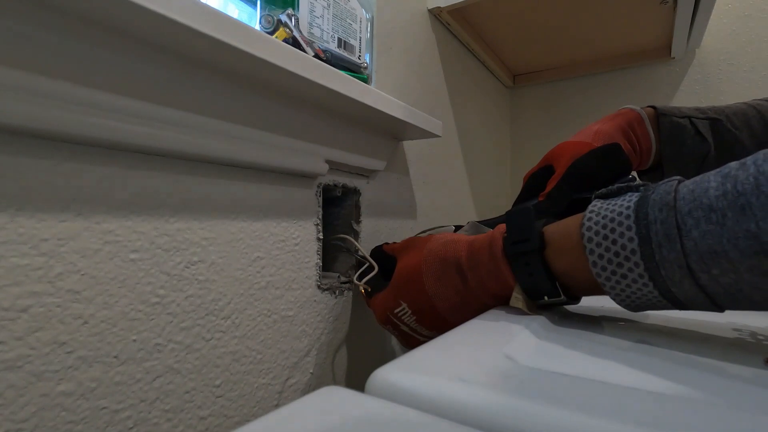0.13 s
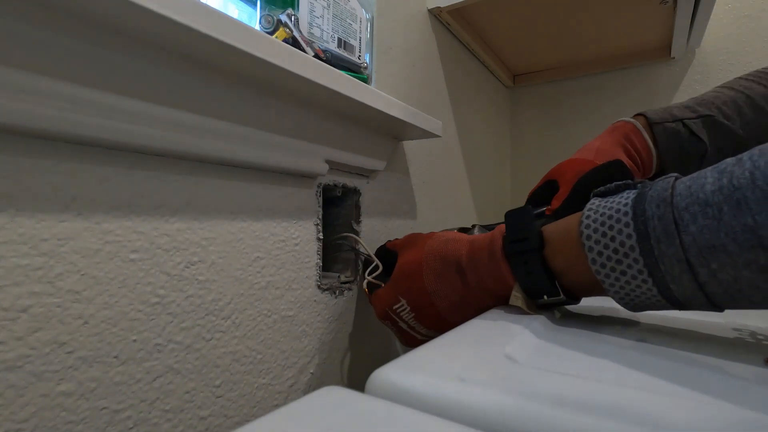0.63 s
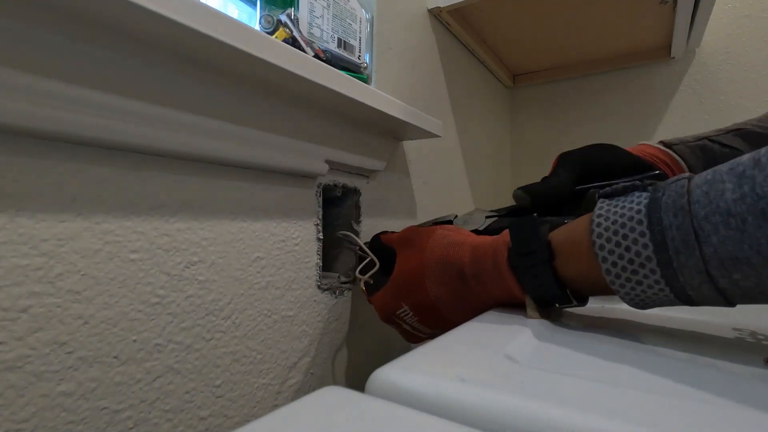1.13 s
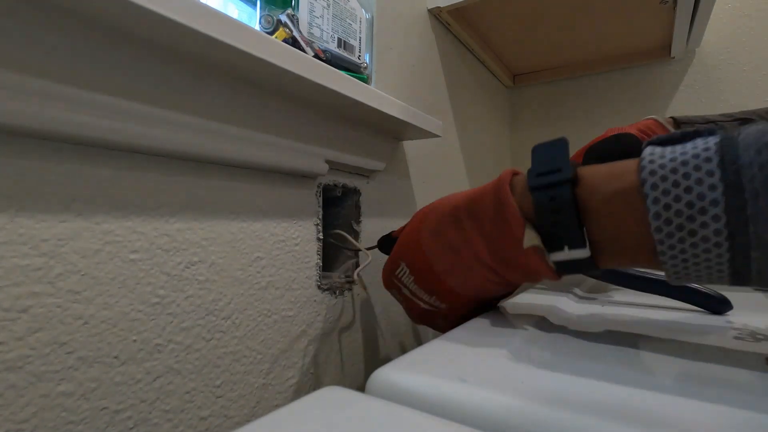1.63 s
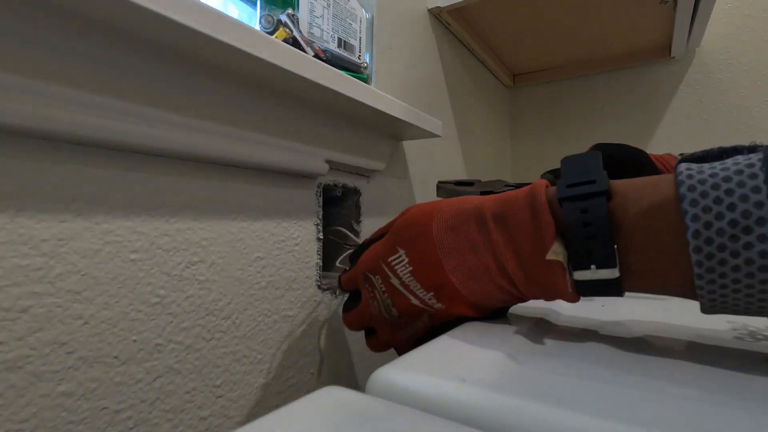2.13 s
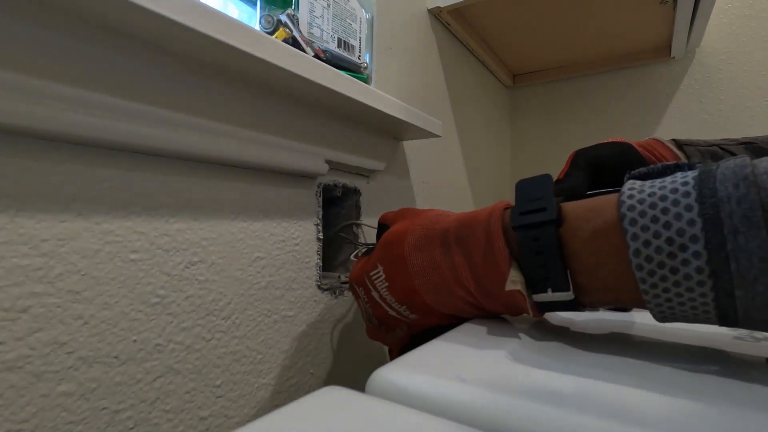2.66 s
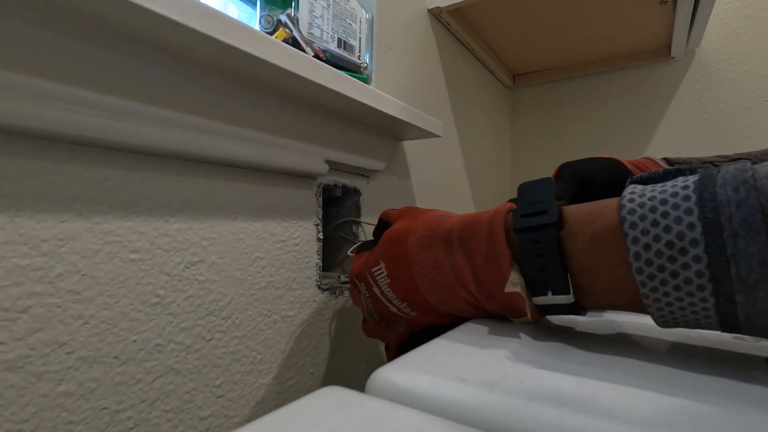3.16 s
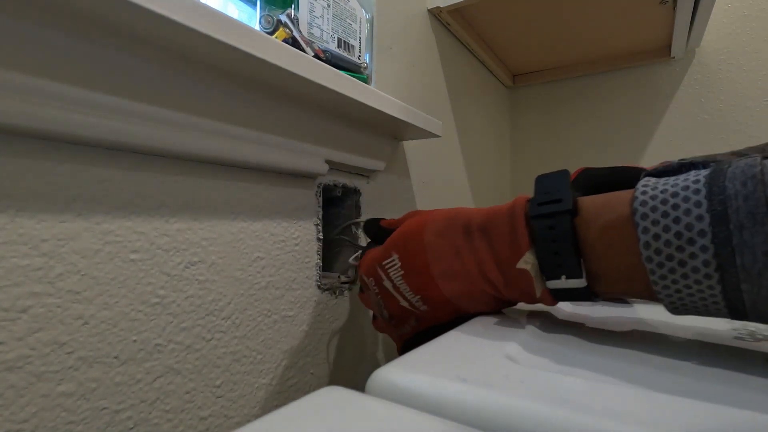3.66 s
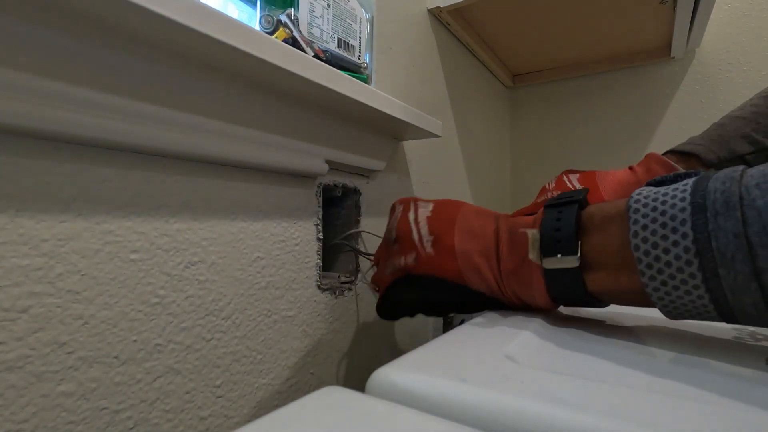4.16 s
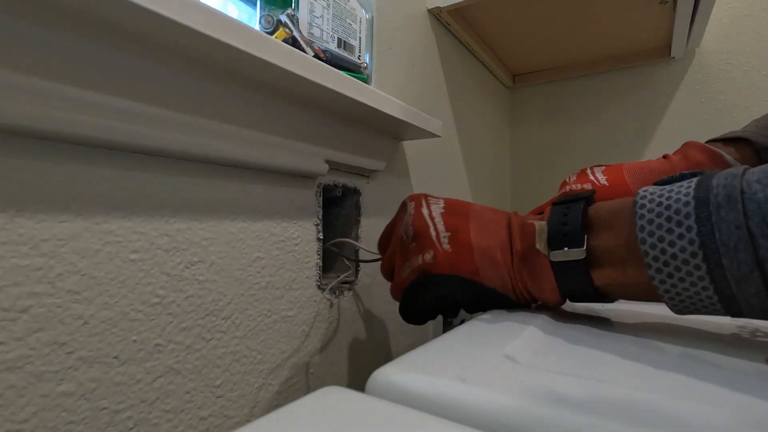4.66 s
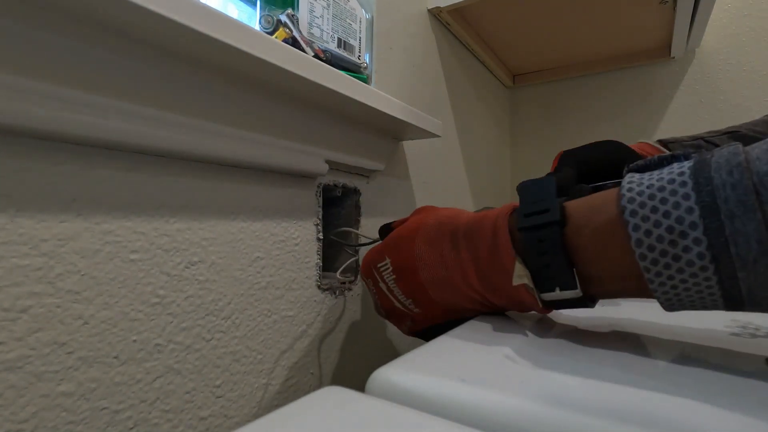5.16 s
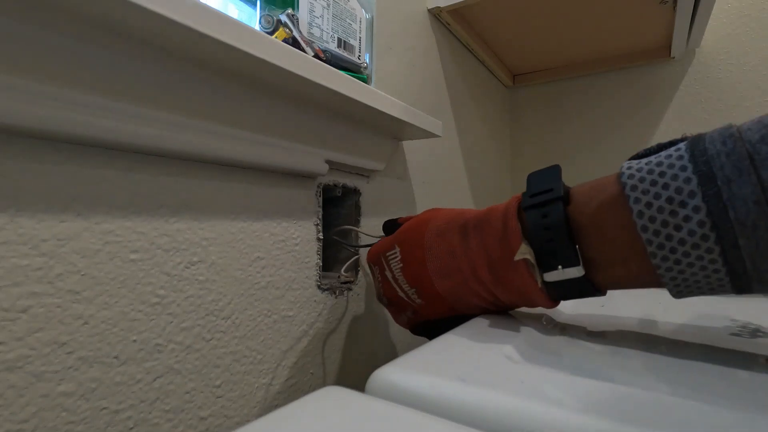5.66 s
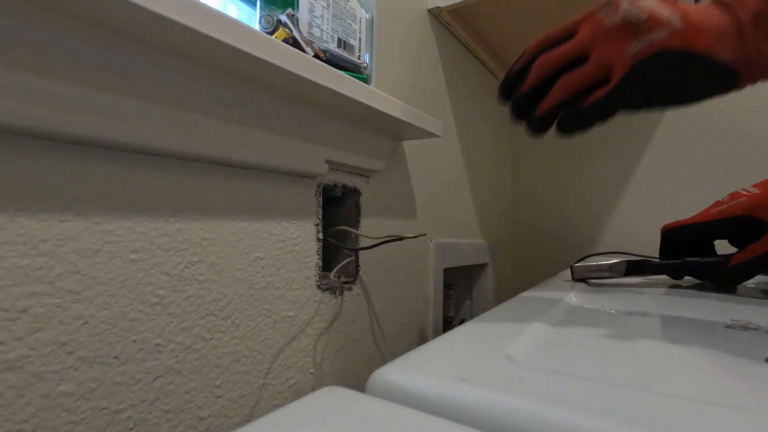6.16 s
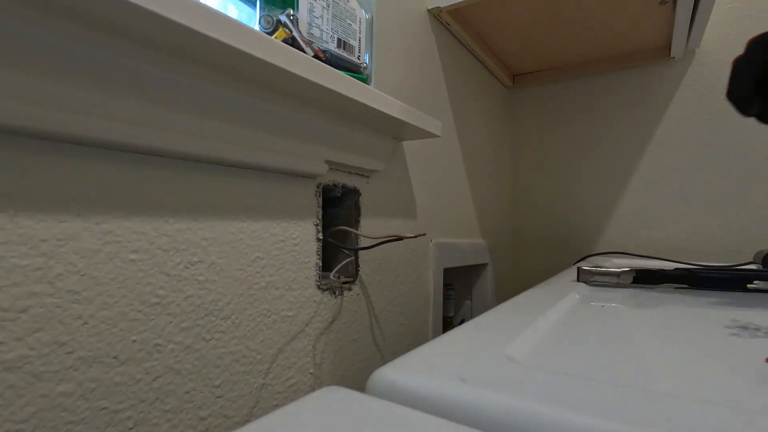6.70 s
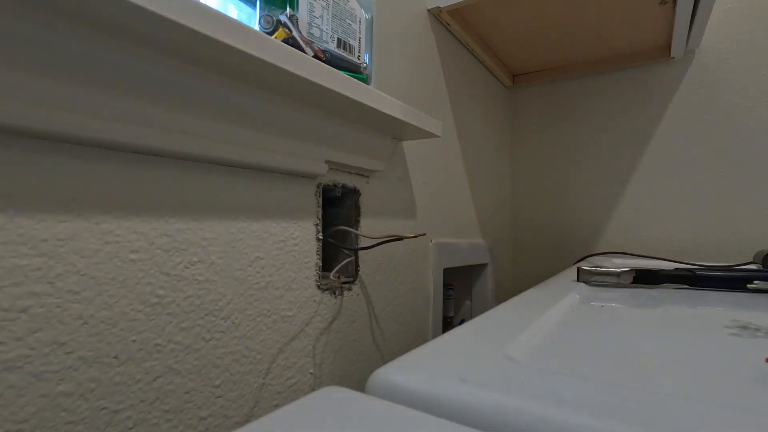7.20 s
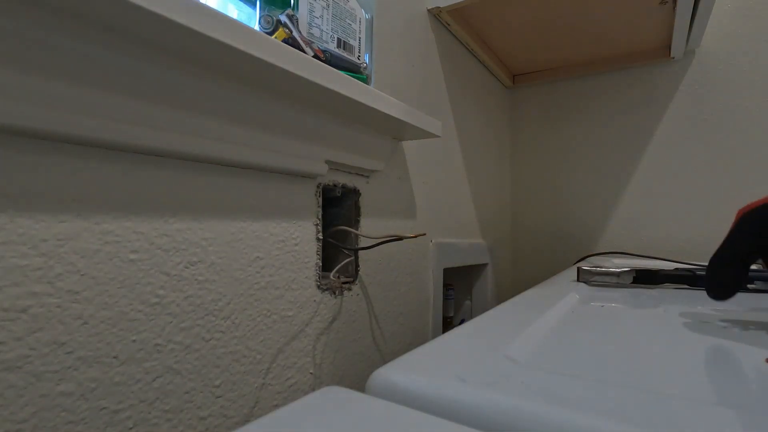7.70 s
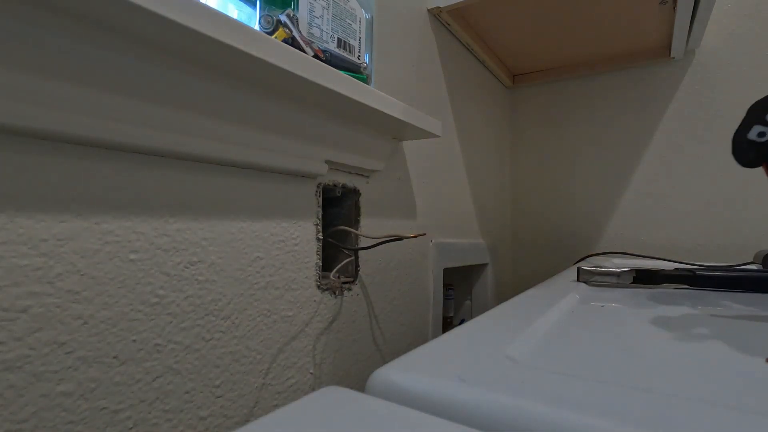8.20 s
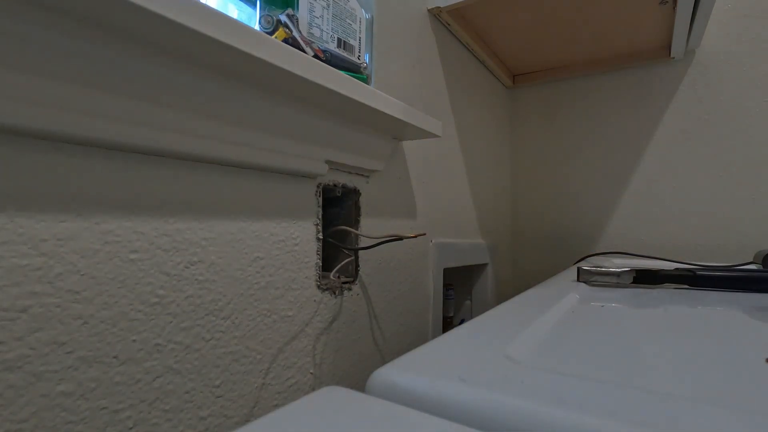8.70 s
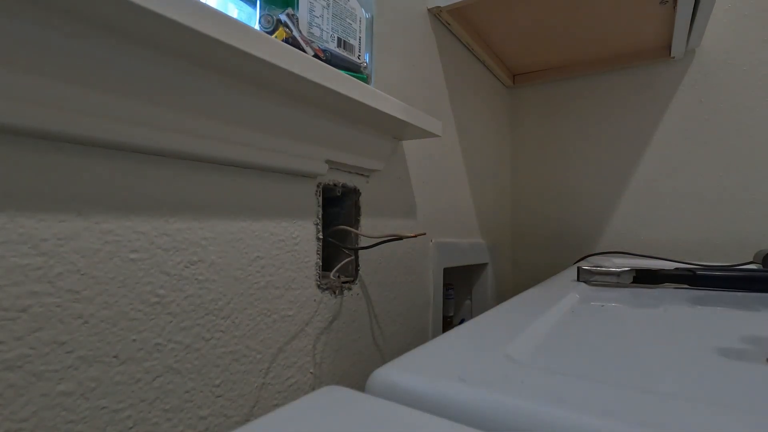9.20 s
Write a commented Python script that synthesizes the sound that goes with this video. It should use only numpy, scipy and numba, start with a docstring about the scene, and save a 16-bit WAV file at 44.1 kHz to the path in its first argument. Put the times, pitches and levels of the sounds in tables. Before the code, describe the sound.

Close wire work indoors: faint ticks, rubbing and rumble, two sharp snips with booming cabinet bangs, a thin screw tinkle, and final metallic knocks.

```python
"""Small room: gloved hands cut and pull wires in a wall box just above two sheet-metal laundry machines.
Blows ring cabinet modes; snips ring jaws, wall and cut wire; ticks are short noise bursts in resonances.
Gloves, sleeves and scrapes are coloured noise; rasps, a squeak and plier chirps come from stick and slip.
A loose screw rings thinly over faint hiss and hum. The microphone stands on one cabinet and feels
every bump; its gain control holds down the loud blows."""
import sys
import numpy as np
from scipy import signal
from scipy.fft import rfft, irfft, next_fast_len
from scipy.io import wavfile
from scipy.ndimage import uniform_filter1d
from numba import njit

SR = 44100
rng = np.random.default_rng(int(sys.argv[2]) if len(sys.argv) > 2 else 0)


def generate_wav(sig):
    """Save sig (samples, or channels by samples) to the path in sys.argv[1] as 16-bit PCM at SR."""
    pcm = np.round(np.clip(np.atleast_2d(sig).T, -1, 1) * 32767).astype(np.int16)
    wavfile.write(sys.argv[1], SR, pcm)


def makeup_ratio(level_db):
    """Linear amplitude ratio for a level in decibels (20 dB per factor of ten)."""
    decades = np.asarray(level_db, float) / 20
    return 10 ** decades


N = 411453  # samples


def level(x, db):
    """Scale to an rms level."""
    return x * makeup_ratio(db) / np.sqrt(np.mean(x ** 2))


def lookup(table, hz):
    """Read (Hz, value) points on a log-frequency axis."""
    table_hz, value = np.transpose(table)
    return np.interp(np.log(np.maximum(hz, 1)), np.log(table_hz), value)


def octaves_above(f, hz):
    """Octaves of f above hz, 0 below."""
    return np.maximum(np.log2((f + 1) / hz), 0)


def octaves_below(f, hz):
    """Octaves of f below hz, 0 above."""
    return np.maximum(np.log2(hz / (f + 1)), 0)


def bump(f, hz, width_hz):
    """Gain of a resonance, 1 at its centre."""
    return 1 / np.sqrt(1 + (2 * (f - hz) / width_hz) ** 2)


def colour(x, gain_db):
    """Causal filter from a function of frequency that gives dB (minimum phase through the cepstrum)."""
    size = 2 * next_fast_len(x.shape[-1] // 2 + 2048)
    hz = np.arange(size // 2 + 1) * SR / size
    ceps = irfft(gain_db(hz) * np.log(10) / 20, size)
    ceps[1:size // 2] *= 2
    response = np.exp(rfft(ceps[:size // 2 + 1], size))
    return irfft(rfft(x, size) * response, size)[..., :x.shape[-1]]


def pair(shape, wide):
    """Left and right noise: a shared part and a weaker opposed part."""
    mid, side = rng.standard_normal((2, *shape))
    return np.stack([mid + wide * side, mid - wide * side]) / np.hypot(1, wide)


def walk(rate_hz):
    """Random levels held 1 / rate_hz s and slewed twice."""
    k = int(SR / rate_hz)
    steps = np.repeat(rng.standard_normal(N // k + 1), k)
    return 1.1 * uniform_filter1d(uniform_filter1d(steps, k), k)[:N]


def decay(t, t60_s):
    """Exponential decay by 60 dB in t60_s."""
    return np.exp(-np.log(1000) * t / t60_s)


def ring(t, hz, db, t60_s):
    """One decaying sine mode."""
    return makeup_ratio(db) * np.sin(2 * np.pi * hz * t) * decay(t, t60_s)


def grit(length_s, spread_db):
    """A stroke of dense slips of very uneven size."""
    size = int(length_s * SR)
    slips = rng.standard_normal(size) * makeup_ratio(spread_db * rng.exponential(size=size))
    return slips * np.sqrt(np.hanning(size))


def add(out, x, s):
    """Mix a sound in at time s."""
    i = int(s * SR)
    out[..., i:i + x.shape[-1]] += x[..., :N - i]


# blows on the cabinets: (time [s], 500-2500 Hz level [dB], boom level [dB], lid panel level [dB],
# treble level [dB], pitch favoured by the spot [Hz])
BLOWS = [(0.37, -73, -74, -42.5, -87, 203), (0.62, -11, -29, -30, -39.5, 180),
         (0.875, -55, -22.5, -48, -61, 55), (1.019, -58.5, -71, -35.5, -88, 239),
         (1.676, 8.5, -4.5, -12.5, -11, 167), (1.92, -38, -33.5, -41, -78.5, 111.3),
         (2.566, -77.5, -37.5, -43.5, -103, 74.7), (2.89, -29.5, -53, -57, -52, 553),
         (3.743, -50, -23, -57, -55, 55.3), (3.811, -30.5, -21.5, -42.5, -71, 60.3),
         (4.174, -46, -60, -42, -68, 207), (4.518, -42, -61.5, -53, -43, 336),
         (4.809, -18, -38, -51, -61, 298), (4.822, -57, -43, -41, -56, 200),
         (4.846, -60, -26.5, -53, -80, 138), (4.892, -37, -57, -41.5, -43.5, 201),
         (5.17, -25.5, -68, -37.5, -84, 216), (5.412, -37, -28.5, -47.5, -52, 117),
         (5.898, -0.5, -6.5, -12.5, -6.5, 183), (5.983, -5.5, -20.5, -18.5, -22, 187),
         (6.424, -10.5, -18.5, -27, -33.5, 115), (6.501, -6.5, -18.5, -24, -25, 183),
         (7.842, -68, -24.5, -52.5, -61, 68), (7.867, -59, -47, -46, -57, 185),
         (7.979, -61.5, -34.5, -46, -78, 95.5), (8.651, -34, -26, -59, -28, 59.1),
         (8.703, -4.5, -17, -33.5, -17.5, 61), (8.937, -18.5, -38, -62, -45, 91),
         (9.086, 1.5, -14, -22, -19.5, 93.5), (9.108, -18, -34, -22, -18, 320),
         (9.219, -5, -16.5, -19.5, -18, 182)]
# strongest sheet-metal modes: (frequency [Hz], relative level [dB], t60 before cap and damping [s])
CABINET_MODES = [(53.4, -3, 1), (91.7, -5, 1), (118.5, -2, 0.95), (167, -5.5, 1), (183, 5, 0.46),
                 (218, -3, 0.98), (283, -7, 0.2), (327.7, -2.5, 0.94), (404, -8, 0.8), (457, -2, 0.28),
                 (554, -16.5, 0.17), (945, -15.5, 0.45), (1042, -20, 0.6), (1222, -22, 0.4),
                 (1375, -21.5, 0.3), (2163, -32, 0.33), (3470, -21.5, 0.2)]
# free ring of the dense modes: (frequency [Hz], typical t60 [s])
FREE_RING = [(40, 0.72), (130, 1), (350, 0.78), (900, 0.98), (2500, 0.096), (8000, 0.79)]
# colour of a blow: (frequency [Hz], relative level [dB per Hz])
BLOW_COLOUR = [(18, -38), (30, -3), (133, -1), (177, -4.5), (256, 2.5), (455, -5.5), (787, -16.5),
               (970, -20.5), (1140, -22.5), (5590, -20), (12300, -43), (14300, -49.5), (15500, -64)]


def hits(count=420):
    """Each blow wakes the cabinet modes in its own mix; a crack and a noisy tail carry the treble."""
    ring_share = 0.58  # damped ring as share of a free ring of about 0.5 s
    t = np.arange(int(0.5 * SR)) / SR
    s, body_db, boom_db, lid_db, bright_db, spot_hz = np.transpose(BLOWS)
    strong_hz, strong_db, strong_t60_s = np.transpose(CABINET_MODES)
    dense_hz = 40 + 4200 * np.sort(rng.random(count)) ** 1.5
    dense_t60_s = lookup(FREE_RING, dense_hz) * makeup_ratio(1.5 * rng.standard_normal(count))
    hz = np.r_[dense_hz, strong_hz]
    t60_s = np.r_[dense_t60_s, np.minimum(strong_t60_s, 0.7)]
    # dense modes follow the colour of a blow, weighted by their spacing
    dense_db = lookup(BLOW_COLOUR, dense_hz) + 3.3 * np.log10(dense_hz / 200) - 10
    mode_db = np.r_[dense_db, strong_db + 3]
    build = 1 - np.exp(-np.outer(hz, t) / 0.35)  # low modes take about a cycle to swing up
    spin = np.exp(np.outer(2j * np.pi * hz - np.log(1000) / t60_s, t))
    waves = (build * spin).astype(np.complex64)

    # strength against an even blow at four pitches; softer contact wakes fewer high modes
    strength = np.transpose([boom_db + 2, lid_db, body_db - 3, bright_db + 11.5])
    points = np.log([80, 260, 1000, 3300])
    strength_db = np.array([np.interp(np.log(hz), points, row) for row in strength])
    fade_db = -14 * np.maximum(np.log2(hz / 2400), 0)  # above this the noisy tail takes over
    gain = makeup_ratio(mode_db + fade_db + strength_db - 10)
    gain = gain * (1 + 1.6 * bump(hz, spot_hz[:, None], spot_hz[:, None] / 6) ** 2)
    chance = rng.standard_normal((len(s), 3, len(hz)))
    mid = gain * makeup_ratio(3 * chance[:, 0]) * np.exp(2j * np.pi * rng.random(gain.shape))
    side_share = np.minimum(0.015 + hz / 4000, 0.33)  # lows reach both ports alike
    side = gain * side_share * (chance[:, 1] + 1j * chance[:, 2])
    modes = (np.r_[mid + side, mid - side].astype(np.complex64) @ waves).imag.reshape(2, len(s), -1)

    noise = pair((len(s), len(t)), 0.49)
    held = decay(t, 0.5 / (1 / ring_share - 1))  # a hand on the panel shortens the ring
    onset = 1 + 0.038 * np.exp(-t / 0.0023)
    tail = np.exp(-t / 0.00063) + 0.78 * decay(t, 0.45 * ring_share)
    out, bright, clatter = np.zeros((3, 2, N))
    for k in range(len(s)):
        add(out, modes[:, k] * held * onset, s[k])
        add(bright, noise[:, k] * tail * makeup_ratio(bright_db[k]), s[k])
        add(clatter, noise[:, k, ::-1] * tail * makeup_ratio(body_db[k]), s[k])  # loose panels buzz along
    buzz = lambda f: lookup(BLOW_COLOUR, f) + 20 * np.log10(bump(f, 900, 1800) ** 3)
    return out + makeup_ratio(-5) * colour(bright, treble) + makeup_ratio(-3.5) * colour(clatter, buzz)


def treble(f):
    """Colour in dB of the bright part of any contact."""
    return lookup(BLOW_COLOUR, f) - lookup(BLOW_COLOUR, 4500) - 12 * octaves_below(f, 3000) ** 2


# bites through a wire: (time [s], level [dB], low tone of the cut end [Hz], high tone [Hz],
# low tone level against the bite [dB], t60 of both [s])
BITES = [(1.676, -9, 1477, 1681, -35.5, 0.97), (5.898, -11, 1534, 1678, -9, 0.33)]
# modes of jaws and wall: (frequency [Hz], level against the bite [dB], t60 [s])
SNAP_MODES = [(1610, -4, 0.046), (1700, -1, 0.044), (2880, -4.5, 0.012), (4800, -18, 0.011),
              (351, -32, 1.6), (400, -29, 1.16), (510, -29.5, 1)]


def snips():
    """One sharp push sets the jaws and the wall ringing; the cut wire end sings on faintly."""
    out, t = np.zeros(N), np.arange(SR) / SR
    snap = -sum(ring(t, *mode) for mode in SNAP_MODES)
    for s, db, low_hz, high_hz, wire_db, t60_s in BITES:
        wire = ring(t, low_hz, wire_db, t60_s) + ring(t, high_hz, wire_db - 1, t60_s)
        add(out, makeup_ratio(db) * (snap + wire), s)
    return out


# contacts of wire and tool: (time [s], relative body level [dB], body pitch [Hz], relative treble level [dB])
CONTACTS = [(0.171, -42, 590, -56), (0.197, -34.5, 604, -83), (0.291, -42.5, 470, -89),
            (0.371, -42.5, 490, -47.5), (0.393, -46.5, 2160, -53), (0.424, -33, 1005, -71),
            (0.484, -34.5, 1000, -69), (0.564, -45.5, 1980, -56.5), (0.751, -61, 770, -45),
            (0.764, -61, 607, -37), (0.93, -38.5, 2100, -53.5), (1.055, -34, 1040, -89),
            (1.327, -33, 1004, -59), (1.422, -41.5, 940, -96), (1.578, -47, 1500, -42),
            (1.918, -49, 1000, -70), (2.193, -35, 1060, -84), (2.315, -44.5, 1096, -86),
            (2.473, -38, 1030, -81), (2.549, -39, 985, -80), (2.599, -46, 945, -80),
            (2.652, -46, 1070, -87), (2.128, -36, 333, -97), (2.726, -33.5, 1520, -54),
            (2.73, -31, 950, -55.5), (2.819, -41.5, 1260, -64), (2.894, -22, 590, -45),
            (2.845, -50, 1300, -62), (2.914, -43, 1850, -48), (2.922, -28.5, 964, -61),
            (2.982, -32, 560, -63), (3.013, -41, 1290, -61), (3.064, -39.5, 965, -50.5),
            (3.092, -41, 980, -55), (3.269, -48, 970, -78), (3.364, -32.5, 950, -44.5),
            (3.431, -36.5, 1880, -57), (3.715, -48, 1940, -85), (3.815, -24, 338, -61),
            (3.915, -24.5, 942, -63), (3.958, -41, 1060, -47), (4.174, -26, 1500, -32),
            (4.199, -29, 1540, -41), (4.255, -25.5, 1360, -42), (4.268, -41, 1370, -38),
            (4.415, -30, 920, -46.5), (4.486, -25, 945, -41), (4.522, -17.5, 340, -57),
            (4.535, -20.5, 1000, -39), (4.518, -30, 1580, -63), (4.633, -36, 960, -61),
            (4.65, -35, 1360, -51), (4.697, -38, 950, -42.5), (4.795, -35.5, 970, -56),
            (4.82, -30, 965, -60), (4.853, -42, 990, -63), (4.833, -33, 1620, -54), (4.893, -21, 990, -52),
            (4.98, -31.5, 970, -63), (5.005, -35, 1010, -78), (5.048, -50, 2020, -61),
            (5.114, -54, 1490, -60), (5.172, -20, 340, -55), (5.178, -23.5, 980, -65),
            (5.245, -59, 1000, -67), (5.409, -28, 1010, -38), (5.429, -22.5, 834, -47),
            (5.535, -43, 2160, -50.5), (5.876, -39.5, 1500, -47), (5.886, -27, 1700, -53),
            (6.876, -44.5, 1140, -62), (7.225, -42, 1104, -71), (7.887, -44, 1170, -51),
            (7.905, -42, 1170, -47), (7.975, -57, 2000, -45.5), (7.99, -67, 1990, -71),
            (8.037, -53, 2050, -82), (8.083, -62, 2100, -63.5), (8.11, -62.5, 2050, -53.5),
            (8.16, -56, 2230, -45), (8.175, -75.5, 2196, -44), (8.2, -70, 2190, -39.5),
            (8.4, -51, 2020, -40), (8.562, -62, 1020, -59), (8.848, -60, 1000, -49)]
# small parts in the box that any tick may ring: (frequency [Hz], width [Hz])
SMALL_PARTS = [(555, 40), (1290, 90), (1650, 110), (1850, 120), (2380, 140), (3300, 220), (4300, 260),
               (5200, 320), (6700, 500)]
# wall box resonances: (frequency [Hz], width [Hz], relative level [dB])
WALL_BOX = [(942, 65, 2), (1324, 900, -8.5), (3000, 18, -8), (3500, 23, -21.5), (3600, 14, -5.5),
            (4600, 270, -14.5)]


def ticks():
    """A crack and its echo in the nook ring body, treble resonance, lesser modes, box and the wall's thud."""
    ping_usual_hz, ping_scatter_octaves = 4570, 0.063
    nook_t60_s, echo_share = 0.58, 0.13  # t60 before the linear fade
    out, t = np.zeros((2, N)), np.arange(SR // 5) / SR
    noise = pair((len(CONTACTS), len(t)), 0.37)
    parts_hz, parts_width_hz = np.transpose(SMALL_PARTS)
    rung = 4 * rng.random((len(CONTACTS), len(SMALL_PARTS))) ** 3
    lesser_hz = parts_hz * (1 + 0.025 * rng.standard_normal(rung.shape))
    pings_hz = ping_usual_hz * 2 ** (ping_scatter_octaves * rng.standard_normal(len(CONTACTS)))
    envelope = 0.55 * np.exp(-t / 0.0061) + echo_share * decay(t, nook_t60_s)
    envelope = envelope * (1 - t / t[-1]) * (1 - np.exp(-t / 0.00017))
    click = 4.5 * (t == t[8])  # first sharp contact
    for k, (s, body_db, body_hz, bright_db) in enumerate(CONTACTS):

        def tick_db(f):
            part = makeup_ratio(10.5) * bump(f, body_hz, body_hz / 6.5) ** 2 + makeup_ratio(-7) * bump(f, 1400, 800) ** 3
            thud = makeup_ratio(11) * bump(f, 280, 230) ** 2
            box = makeup_ratio(5.5) * bump(f, *WALL_BOX[0][:2]) ** 3
            ping = makeup_ratio(-12) * bump(f, pings_hz[k], pings_hz[k] / 7) + makeup_ratio(6.5)
            ping = ping * makeup_ratio(bright_db + treble(f) + 6.2 * octaves_above(f, 5500))
            lesser = zip(rung[k], lesser_hz[k], parts_width_hz)
            metal = 1 + sum(g * bump(f, hz, width_hz) ** 2 for g, hz, width_hz in lesser)
            return 20 * np.log10((makeup_ratio(body_db) * (part + thud + box) + ping) * metal)

        add(out, colour(noise[:, k] * envelope + click, tick_db), s)
    return out


def aftershock(s, db, peak_s):
    """Energy that swells and dies away after each blow."""
    u = np.maximum(np.arange(N)[::64] / SR - s[:, None], 0) / peak_s
    swell = u * np.exp(1 - u)
    return np.repeat(np.sqrt(makeup_ratio(db) ** 2 @ swell ** 2), 64)[:N]


# hands at work: (time [s], relative 500-2500 Hz rub level [dB], relative cloth hiss level [dB])
GLOVES = [(0.0, -72, -85), (0.7, -56, -66), (1.529, -67.5, -74.5), (1.74, -24.5, -42), (1.9, -62, -68.5),
          (2.521, -70, -63.5), (2.91, -54.5, -109), (3.15, -79, -102), (3.33, -63.5, -71),
          (3.77, -56, -55.5), (4.18, -62, -74), (4.39, -50.5, -71.5), (5.2, -60.5, -63.5),
          (5.299, -76.5, -75), (5.72, -68.5, -67.5), (6.08, -57.5, -68), (7.3, -75, -78), (8.7, -65, -68),
          (8.81, -71, -48), (9.12, -35, -66.5), (9.33, -86, -85)]
# weight of the arms on the cabinets: (time [s], rumble level [dB])
ARM_WEIGHT = [(0.0, -40.5), (0.31, -47), (0.93, -34), (1.38, -39), (1.79, -29), (2.26, -43.5), (3.19, -40),
              (4.0, -41.5), (4.6, -38), (5.14, -29.5), (5.87, -47.5), (6.0, -55), (6.37, -30.5),
              (6.55, -45), (7.27, -45.5), (8.58, -44.5), (8.78, -65), (9.33, -46)]
# scrapes of wire and glove: (start [s], length [s], relative body level [dB], relative hiss level [dB])
STROKES = [(0.733, 0.29, -58.5, -52.5), (1.15, 0.22, -80, -56), (1.48, 0.2, -59, -49.5),
           (2.195, 0.084, -55.5, -56.5), (2.487, 0.056, -47.5, -65.5), (2.888, 0.05, -36, -63),
           (3.577, 0.12, -41.5, -54.5), (3.759, 0.1, -48, -50), (3.881, 0.16, -44.5, -69),
           (4.266, 0.13, -44.5, -59.5), (4.477, 0.097, -42, -52), (4.622, 0.069, -46, -50),
           (4.802, 0.061, -52, -49), (5.026, 0.17, -50.5, -58), (5.36, 0.107, -47, -53),
           (5.657, 0.14, -55, -80), (6.289, 0.11, -46.5, -61), (7.822, 0.19, -53.5, -58.5),
           (8.092, 0.13, -91, -58), (8.636, 0.13, -29, -36), (8.714, 0.086, -36.5, -56)]
# colour of rubbing: (frequency [Hz], relative level [dB per Hz])
RUB_COLOUR = [(120, -43.5), (200, 17.5), (283, 0), (446, -0.5), (690, -14), (923, -8.5), (1050, -6),
              (1330, -1.5), (2650, -25.5), (7620, -25), (12200, -49), (15500, -57)]
# colour of the arms' rumble: (frequency [Hz], relative level [dB per Hz])
LEAN_COLOUR = [(12, -27), (20, 13.5), (31, 5.5), (49, -10), (71, -6.5), (136, -21.5), (230, -21.5),
               (400, -48.5), (520, -61.5), (880, -120)]


def hands():
    """Rubbing is noise roughened by tiny slips, ringing in the wall box; the arms rumble in the cabinets."""
    shake_peak_s, shake_db = 0.045, -36  # loose parts shake on after a blow; level against the blow
    rock_peak_s, rock_db = 0.15, -18.5  # cabinets rock on their feet after a boom; level against the boom
    t = np.arange(N) / SR
    s, rub_db, cloth_db = np.transpose(GLOVES)
    rub, hiss = makeup_ratio(np.interp(t, s, rub_db)), makeup_ratio(np.interp(t, s, cloth_db))
    lean = makeup_ratio(np.interp(t, *np.transpose(ARM_WEIGHT)))
    blow_s, blow_db, boom_db = np.transpose(BLOWS)[:3]
    rub = np.hypot(rub, aftershock(blow_s, blow_db + shake_db, shake_peak_s))
    lean = np.hypot(lean, aftershock(blow_s, boom_db + rock_db, rock_peak_s))
    for start_s, length_s, body_db, hiss_db in STROKES:
        span = slice(int(start_s * SR), int((start_s + length_s) * SR))
        stroke = np.sin(np.pi * (t[span] - start_s) / length_s)
        rub[span] = np.hypot(rub[span], makeup_ratio(body_db) * stroke)
        hiss[span] = np.hypot(hiss[span], makeup_ratio(hiss_db) * stroke)

    grain = pair((N,), 0.53) * makeup_ratio(2.7 * walk(250) + 2 * walk(60) + 3 * walk(15))

    def hollow(f):
        box = sum(makeup_ratio(db) * bump(f, hz, width_hz) for hz, width_hz, db in WALL_BOX)
        return lookup(RUB_COLOUR, f) + 20 * np.log10(makeup_ratio(-10.5) + box)

    low = colour(grain, lambda f: hollow(f) - 30 * octaves_above(f, 2500))
    high = colour(grain, lambda f: hollow(f) - 30 * octaves_below(f, 2500))
    rumble = pair((N,), 0.08) * makeup_ratio(walk(25) + 3 * walk(6))
    rumble = colour(rumble, lambda f: lookup(LEAN_COLOUR, f))
    body = level(low, -6.5) + level(rattle(), -3.5)
    return body * rub + level(high, -1.3) * hiss + level(rumble, 0) * lean


def rattle(count=12):
    """Wire ends catch and slip: sparse pokes in clumps, each part ringing briefly at its own pitch."""
    out = 0
    for hz in 260 * 2 ** (4.1 * (np.arange(count) + rng.random(count)) / count):
        poked = rng.random(N) < 90 / SR * makeup_ratio(5 * walk(14))
        pokes = poked * makeup_ratio(np.minimum(3 * rng.exponential(size=N), 8))
        fade = signal.lfilter([1], [1, -np.exp(-1 / (0.0051 * SR))], pokes)
        push = pair((N,), 0.1) * fade
        out = out + signal.lfilter(*signal.iirpeak(hz, 14, SR), push) * makeup_ratio(lookup(RUB_COLOUR, hz))
    return out


# wire dragged over an edge: (start [s], length [s], level [dB], resonance [Hz], width [Hz])
DRAGS = [(3.601, 0.11, -54.5, 1630, 1100), (4.293, 0.055, -55, 1300, 403), (4.472, 0.034, -54, 1160, 497),
         (4.622, 0.042, -52, 1400, 400), (8.655, 0.043, -41, 2420, 900), (8.69, 0.061, -34.5, 980, 850),
         (8.813, 0.067, -49, 4860, 2174), (8.94, 0.21, -47, 990, 605)]


def rasps():
    """Dense slips ring a broad resonance, with a few sharper ones inside it."""
    out = np.zeros((2, N))
    for s, length_s, db, hz, width_hz in DRAGS:
        slips = grit(length_s, 2.2) + 0.4 * np.outer([1, -1], grit(length_s, 2.2))
        push = np.pad(slips, ((0, 0), (0, 800)))
        sharp_hz = hz + width_hz * rng.uniform(-0.41, 0.41, 4)

        def edge_db(f):
            sharp = 1 + sum(0.7 * bump(f, p, p / 20) ** 2 for p in sharp_hz)
            return 20 * np.log10(bump(f, hz, width_hz) ** 2 * sharp)

        add(out, level(colour(push, edge_db), db), s)
    return out


# insulation squeaks on the box edge: (time [s], pitch [Hz], level [dB])
INSULATION = [(3.71, 2270, -66), (3.719, 2250, -52), (3.736, 1703, -45.5), (3.752, 1896, -51),
              (3.768, 2350, -52), (3.784, 2400, -64)]


def squeak():
    """A stick-slip tone with a wavering period and its octave."""
    s, hz, db = np.transpose(INSULATION)
    t = np.arange(s[0], s[-1], 1 / SR)
    waver = uniform_filter1d(rng.standard_normal((2, len(t))), size=40) * np.sqrt(40)
    pitch_hz = np.interp(t, s, hz) * (1 + 0.05 * waver[0])
    phase = 2 * np.pi * np.cumsum(pitch_hz) / SR
    tone = np.sin(phase) + makeup_ratio(-10) * np.sin(2 * phase)
    out = np.zeros(N)
    add(out, makeup_ratio(np.interp(t, s, db) + 3.2 * waver[1]) * tone, s[0])
    return out


# plier joint chirps: (start [s], length [s], level [dB], lean to the upper modes [dB])
JOINT_CHIRPS = [(1.572, 0.02, -62, 9), (1.588, 0.03, -58, 1), (1.62, 0.045, -69, 16),
                (5.378, 0.025, -65, 8), (5.408, 0.04, -61, -12)]
# plier modes: (frequency [Hz], width [Hz], relative level [dB])
PLIER_MODES = [(2250, 50, 0), (3410, 260, -9), (4290, 40, -1), (5000, 300, -10), (6600, 400, -11)]


def pliers():
    """The joint sticks and slips in gritty jerks as the jaws close; its modes ring on."""
    out = np.zeros(N)
    for s, length_s, db, tilt_db in JOINT_CHIRPS:
        push = np.r_[grit(length_s, 2.5), np.zeros(SR // 10)]
        sound = 0
        for hz, width_hz, mode_db in PLIER_MODES:
            gain = makeup_ratio(mode_db + tilt_db * np.clip(np.log2(hz / 2250), 0, 1)) / np.sqrt(width_hz)
            sound = sound + gain * signal.lfilter(*signal.iirpeak(hz, hz / width_hz, SR), push)
        add(out, level(sound, db) * np.sqrt(len(push) / SR / length_s), s)  # rms over the stroke alone
    return out


# loose screw: (time [s], level [dB])
SCREW_KNOCKS = [(7.976, -53), (8.11, -53.5)]
# screw modes: (frequency [Hz], relative level [dB], t60 until gripped [s])
SCREW_MODES = [(10100, -9, 0.64), (14000, -27, .6), (2150, -19, 0.15)]


def screw():
    """A small steel part rings thinly when it is picked up, until it is gripped."""
    grip_s, grip_decay_s = 8.16, 0.0088  # fingers close on it
    out, t = np.zeros(N), np.arange(SR // 2) / SR
    free = sum(ring(t, *mode) for mode in SCREW_MODES)
    for s, db in SCREW_KNOCKS:
        add(out, makeup_ratio(db) * free * np.exp(-np.maximum(s + t - grip_s, 0) / grip_decay_s), s)
    return out


# colour of the room hiss: (frequency [Hz], relative level [dB per Hz])
ROOM_COLOUR = [(150, -42.5), (250, -13), (433, -25), (559, -21.5), (599, -24.5), (631, -13.5), (711, -16),
               (844, -29.5), (1020, -19.5), (2660, -36), (5850, -26.5), (11000, -38.5), (15000, -40)]
# hum lines: (frequency [Hz], typical rms level [dB])
HUM_LINES = [(193.8, -74.5), (624.5, -82), (1034, -99.5)]


def room():
    """Faint hiss and a few wavering hum lines."""
    t = np.arange(N) / SR
    hum = 0
    for hz, db in HUM_LINES:
        strength = np.sqrt(2) * makeup_ratio(db + 2.5 * walk(5))
        hum = hum + strength * np.sin(2 * np.pi * hz * t + 1.5 * walk(3))
    hiss = colour(pair((N,), 0.18), lambda f: lookup(ROOM_COLOUR, f))
    return level(hiss, -74) + hum


def scene():
    """All sources at the microphone."""
    return hits() + snips() + ticks() + hands() + rasps() + squeak() + pliers() + screw() + room()


@njit
def follow(x, attack, release):
    """Envelope that rises fast and falls slowly."""
    e, out = 1e-9, np.empty(len(x))
    for i in range(len(x)):
        e += (x[i] - e) * (attack if x[i] > e else release)
        out[i] = e
    return out


def top_cut(x):
    """Nothing passes above the cut-off."""
    return signal.sosfilt(signal.butter(12, 15860, fs=SR, output="sos"), x)


def record(dry):
    """Gain control looks 2 ms ahead, presses loud blows down and recovers slowly."""
    threshold_db, press = -8, 0.65  # share of the excess in dB taken off
    attack_s, release_s, ahead = 0.0006, 0.07, 88  # ahead in samples
    # the microphone drops the deepest bass
    dry = signal.sosfilt(signal.butter(2, 44, "high", fs=SR, output="sos"), dry)
    # the left port is brighter
    tilt_db = lambda f: np.clip(f / 7000 - 0.3, -0.3, 1)
    left, right = colour(dry[0], tilt_db), colour(dry[1], lambda f: -tilt_db(f))
    # the ports differ most in the top, least in the bass
    mid, side = (left + right) / 2, (left - right) / 2
    side = colour(side, lambda f: 5 * np.clip(octaves_above(f, 8000), 0, 1)
                  - 3.1 * np.clip(octaves_below(f, 250), 0, 1))
    ports = np.array([mid + side, mid - side])
    envelope = follow(np.abs(ports).max(axis=0), 1 / (attack_s * SR), 1 / (release_s * SR))
    gain = np.minimum(makeup_ratio(threshold_db) / envelope, 1) ** press
    gain = np.r_[gain[ahead:], gain[-ahead:]]
    return top_cut(ports * gain)


dry = scene()
out = record(dry)
generate_wav(out)
```